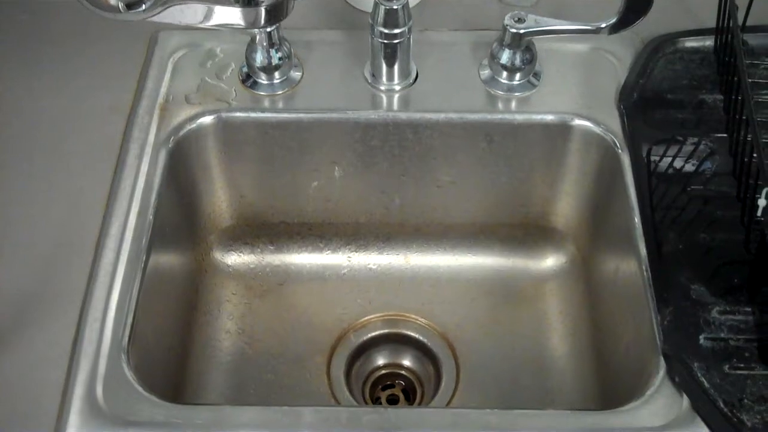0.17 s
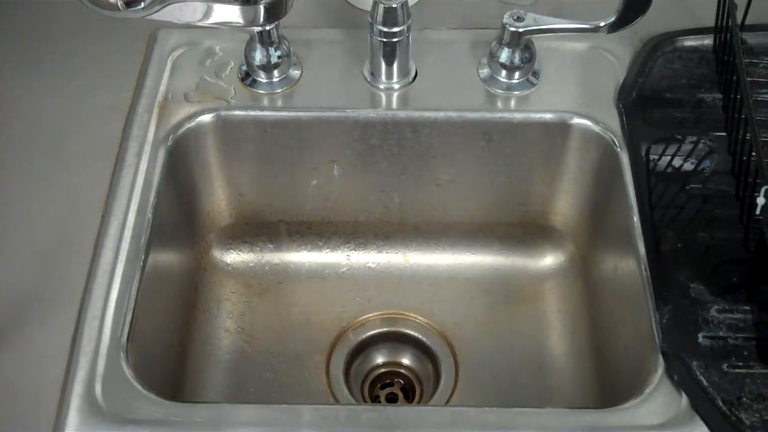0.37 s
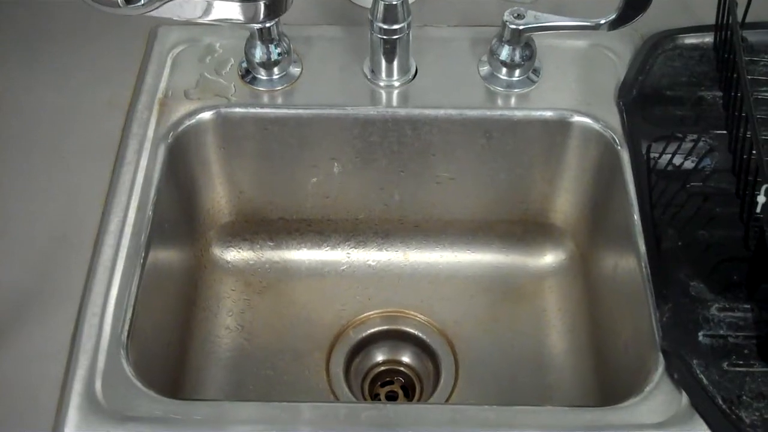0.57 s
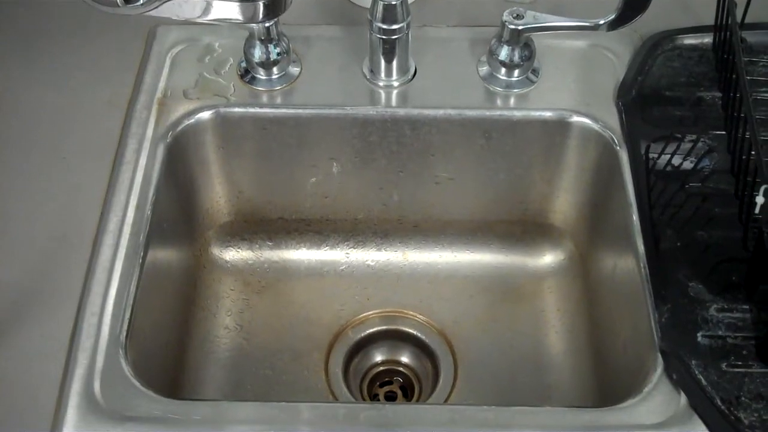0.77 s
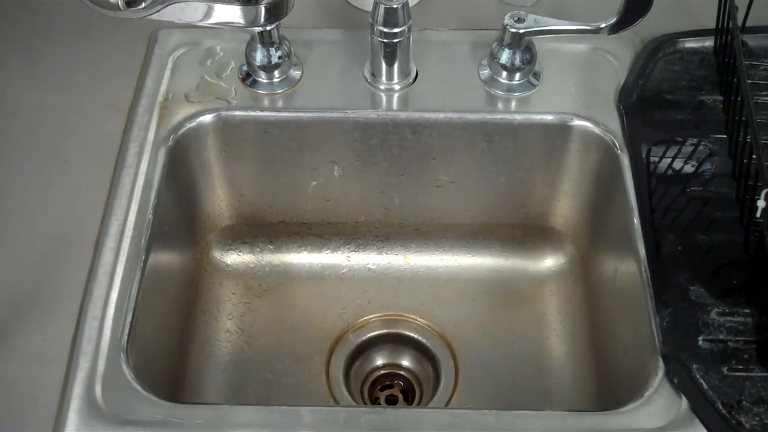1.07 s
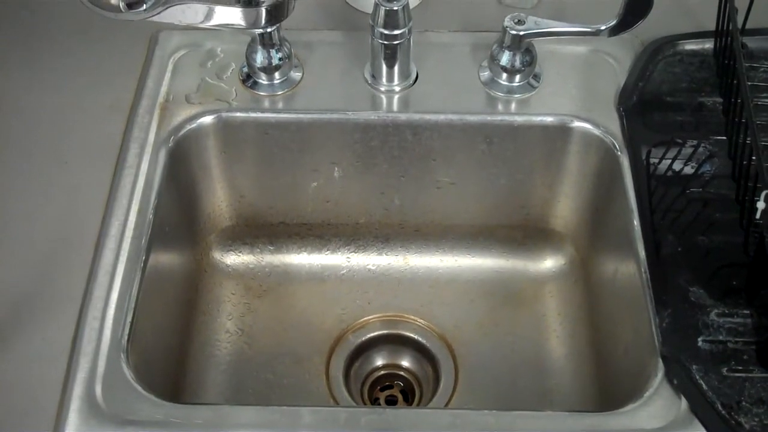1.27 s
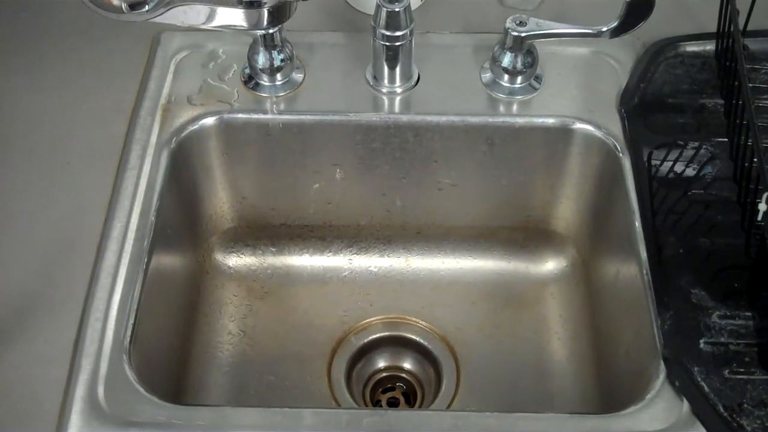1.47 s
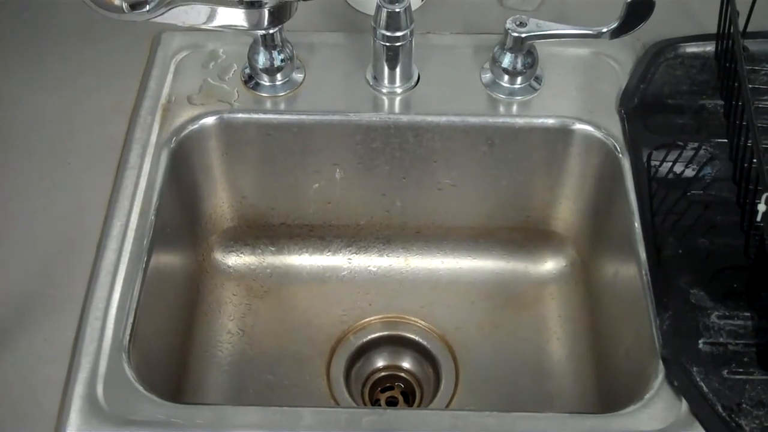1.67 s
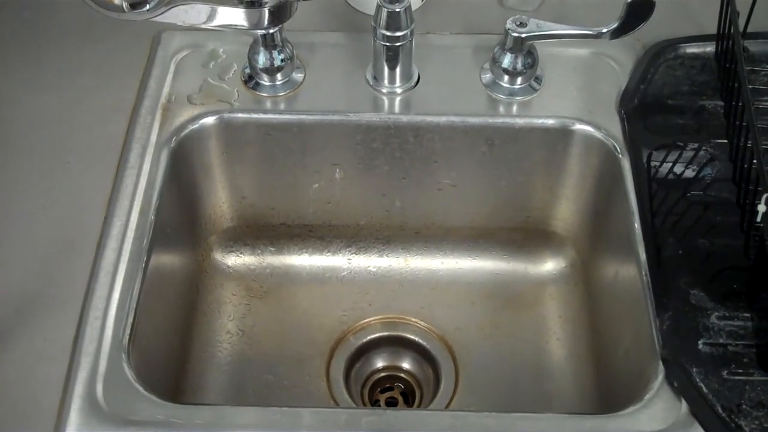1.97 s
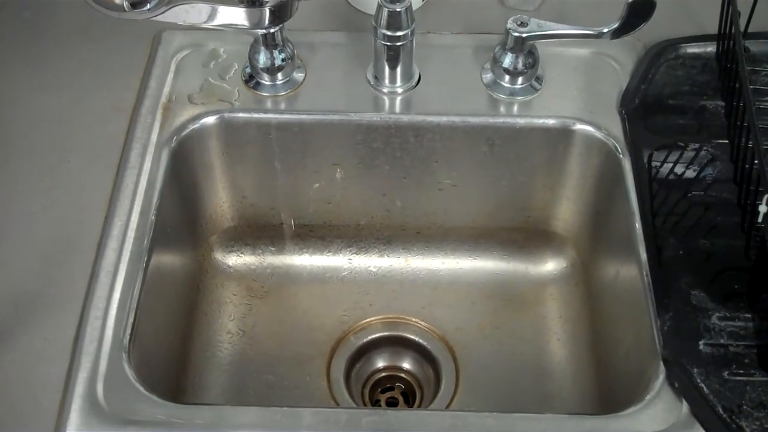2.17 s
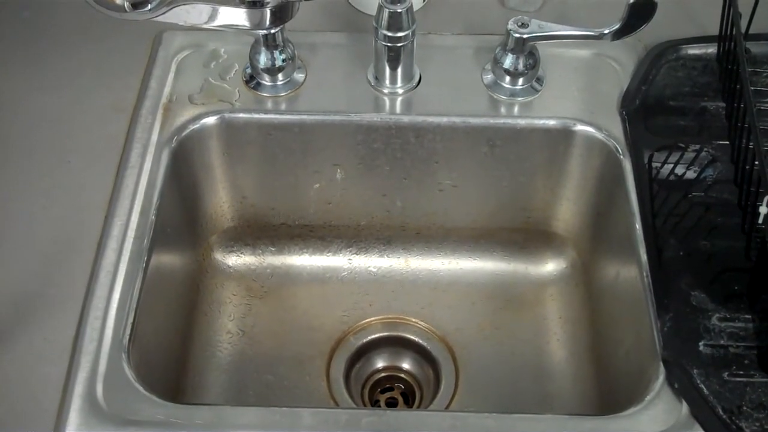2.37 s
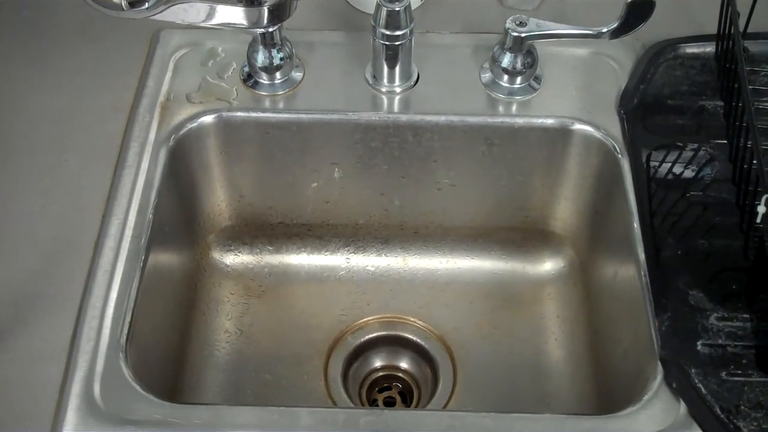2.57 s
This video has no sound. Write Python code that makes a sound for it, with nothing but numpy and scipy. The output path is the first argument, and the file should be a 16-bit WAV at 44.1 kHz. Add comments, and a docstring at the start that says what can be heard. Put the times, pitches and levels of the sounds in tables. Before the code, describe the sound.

Water drops tap a metal sink and plink in the drain while an appliance hums.

```python
"""Dripping faucet in a quiet kitchen

A stereo microphone at a steel sink switches on with a pop just after the start. Each drop taps the basin
and a tiny droplet follows it. At a pace of their own, drips fall down the drain and plink, most trapping
a bubble. Behind them an appliance hums in the small room."""
import sys
import numpy as np
from scipy import signal
from scipy.fft import rfft, irfft
from scipy.io import wavfile
from scipy.ndimage import uniform_filter1d

SR = 44100
rng = np.random.default_rng(int(sys.argv[2]) if len(sys.argv) > 2 else 0)


def persist_wave(psi):
    """Save psi, clipped to +-1, as 16-bit WAV."""
    counts = np.round(np.clip(psi, -1, 1) * 32767).astype(np.int16)
    wavfile.write(sys.argv[1], SR, np.atleast_2d(counts).T)


N = 119952
t = np.arange(N) / SR
LEFT_RIGHT = np.array([[.5], [-.5]])  # splits a lag or level difference between the microphone's ports


def undb(db):
    """Decibels to gain."""
    return 10 ** (np.asarray(db) / 20)


def noise(spectrum):
    """Noise of rms 1, shaped by (Hz, dB) points."""
    hz, db = np.array(spectrum).T
    bins_hz = np.maximum(np.fft.rfftfreq(N, 1 / SR), 1)
    shape = undb(np.interp(np.log(bins_hz), np.log(hz), db))
    shaped = irfft(rfft(rng.standard_normal(N)) * shape, N)
    return shaped / shaped.std()


def wander(rate_hz):
    """A smooth random curve with a spread of 1."""
    jagged = np.interp(t * rate_hz, np.arange(256), rng.standard_normal(256))
    smooth = uniform_filter1d(jagged, int(SR / rate_hz))
    return smooth / smooth.std()


def fade(t60_s):
    """Exponential decay, 60 dB down after t60_s."""
    return np.exp(-np.log(1000) * t / t60_s)


def rise(attack_s):
    """An onset that builds up over the attack time."""
    return 1 - np.exp(-t / attack_s)


def delay(sound, seconds):
    """The same stereo sound, starting later."""
    return np.pad(sound, ((0, 0), (int(seconds * SR), 0)))[:, :N]


def ring(modes, max_lag_s):
    """Decaying modes of alternating sign; each reaches the two ports from its own direction."""
    out = 0
    directions = rng.uniform(-1, 1, len(modes))
    for k, (hz, db, t60_s) in enumerate(modes):
        age = t + directions[k] * max_lag_s * LEFT_RIGHT
        out += (-1) ** k * undb(db) * fade(t60_s) * np.sin(2 * np.pi * hz * age)
    return out


def burst(spectrum, t60_s):
    """Dying noise at both ports, alike in the bass."""
    mid, side = noise(spectrum), noise(spectrum)
    side = signal.sosfilt(signal.butter(1, 1500, "high", fs=SR, output="sos"), side)
    return np.array([mid + side, mid - side]) * fade(t60_s) / np.sqrt(2)


# The appliance's hum, plus the air in the basin ringing faintly at 1599, 1917 and 2079 Hz.
# Each row: frequency in Hz, rms level in dB.
STEADY_TONES = [(59.5, -71), (199, -61.5), (437, -68), (559.5, -62.5), (700, -70), (1087, -81.5),
                (1278, -58.5), (1599, -68), (1917, -72.5), (2079, -79)]
# Fan noise and hiss, shared by the ports (mid) and opposed between them (side).
# Each row: frequency in Hz, relative density in dB.
FAN_MID = [(25, -31), (55, -3.5), (95, -2.5), (150, -9.5), (200, 3.5), (320, 3.5), (500, -2), (780, -2),
           (1300, -7.5), (2000, -13), (2800, -18.5), (5000, -23.5), (6800, -20), (9000, -26), (14000, -32)]
FAN_SIDE = [(25, -26), (90, -4), (150, -7), (210, -1.5), (700, -4), (1400, -1.5), (2000, -6), (2800, -11.5),
            (5000, -12.5), (6800, -10), (9000, -16.5), (14000, -22.5)]


def room_tone(pan_db=-1.74, lag_s=.0001, flutter_db=.84, waver_db=.8, drift_hz=.6):
    """A little to the right, the appliance's hum and faint basin air tones waver over fan noise and hiss."""
    mid = undb(-50 + flutter_db * wander(14)) * noise(FAN_MID)
    side = undb(-58) * noise(FAN_SIDE)
    out = np.array([mid + side, mid - side])
    port_time = np.array([t + lag_s, t])
    for hz, db in STEADY_TONES:
        drift = drift_hz * np.cumsum(wander(5.04)) / SR
        cycles = hz * port_time + drift + rng.random()
        amplitude = np.sqrt(2) * undb(db + waver_db * wander(7.1))
        out += amplitude * np.sin(2 * np.pi * cycles)
    return out * undb(pan_db * LEFT_RIGHT)


def kitchen(direct, reverb_db=-12, top_hz=7200):
    """The small room adds a short, soft reverberation behind the direct sound."""
    tail = rng.standard_normal((2, N)) * fade(t60_s=.2) * rise(attack_s=.016)
    tail /= np.sqrt(np.sum(tail ** 2, axis=1, keepdims=True))
    tail = signal.sosfilt(signal.butter(1, top_hz, fs=SR, output="sos"), tail)
    return direct + undb(reverb_db) * signal.fftconvolve(direct, tail, axes=1)[:, :N]


def switch_on_pop(on_s, open_s, sag_s=.048, coupling_hz=1.15, damping=1.15):
    """A voltage step starts with a crack, sags, ends, and settles through the microphone's coupling."""
    sag = np.exp(-np.maximum(t - on_s, 0) / sag_s)
    step = undb(-3.5) * sag * (t >= on_s) * (t < open_s)
    omega = 2 * np.pi * coupling_hz
    highpass = signal.bilinear([1, 0, 0], [1, damping * omega, omega ** 2], SR)
    pop = signal.lfilter(*highpass, step)
    crack = undb(-17) * rng.standard_normal((2, N)) * fade(t60_s=.0028)
    snap = undb(-9.5) * np.exp(-t / .00004)
    opposed_pop = np.array([pop, -undb(.2) * pop])
    return opposed_pop + delay(crack - snap, on_s)


# Stray spray in the sink. Each row: start in seconds, band centre in Hz, level in dB.
SPECKS = [(0.419, 6450, -58), (.7596, 8460, -52), (1.265, 9350, -53.5)]


def spray(relative_width=.17):
    """Specks of spray land with faint, high ticks."""
    out = 0
    edge = 1 + relative_width / 2
    for start_s, hz, db in SPECKS:
        band = signal.butter(2, [hz / edge, hz * edge], "band", fs=SR, output="sos")
        fizz = signal.sosfilt(band, rng.standard_normal((2, N)))
        tick = fizz / fizz.std() * fade(t60_s=.036) * rise(attack_s=.0007)
        out += delay(undb(db) * tick, start_s)
    return out


def bubble(hz, basin_air, lag_s, glide_per_s=3):
    """A trapped bubble rings briefly, rising in pitch, and sets the air in the basin ringing."""
    age = t + lag_s * LEFT_RIGHT
    cycles = hz * (age + glide_per_s * age ** 2 / 2)
    tone = np.sin(2 * np.pi * cycles) * rise(attack_s=.0004) * fade(t60_s=.024)
    return tone + signal.fftconvolve(tone, basin_air, axes=1)[:, :N]


# Modes of the drain and of the air in the basin.
# Each row: frequency in Hz, gain in dB, time to fall 60 dB in seconds.
DRAIN_MODES = [(4650, -47, .017), (5080, -47, .015), (5630, -51, .022), (6260, -38, .027), (7030, -47, .02),
               (7190, -39.5, .026), (7620, -52, .022), (8750, -51, .02)]
BASIN_AIR_MODES = [(1520, -43, .08), (1610, -50, .06), (1755, -38, .06), (1950, -52, .04),
                   (2090, -50, .045), (2950, -19, .03)]
# The tick of a drip on water. Each row: frequency in Hz, relative density in dB.
TICK_SPECTRUM = [(500, -10), (1800, -27), (3500, -14.5), (5000, 13), (7200, 7.5), (10000, -10),
                 (14000, -11)]
# Drips down the drain. Each row: start in seconds, tick gain in dB, bubble pitch in Hz, its gain in dB.
DRAIN_DRIPS = [(0.3103, -7.5, 1590, -24.5), (0.8204, -5.5, 1920, -27.5), (1.3239, 3, 2060, -23),
               (2.2972, 3, 2000, -70), (2.6725, -15, 2850, -55.5)]


def drain_plinks(pan_db=1.2, bubble_lag_s=.00007):
    """Just left of centre, drips tick on the water in the drain, ring its cavity and trap bubbles."""
    cavity = ring(DRAIN_MODES, max_lag_s=.00004)
    basin_air = ring(BASIN_AIR_MODES, bubble_lag_s)
    out = 0
    for start_s, tick_db, hz, bubble_db in DRAIN_DRIPS:
        impact = undb(-39) * burst(TICK_SPECTRUM, t60_s=.024)
        tick = undb(tick_db) * (cavity + impact) * rise(attack_s=.0003)
        plink = undb(bubble_db) * bubble(hz, basin_air, bubble_lag_s)
        out += delay(tick + plink, start_s)
    return out * undb(pan_db * LEFT_RIGHT)


# Modes of the steel basin. Each row: frequency in Hz, gain in dB, time to fall 60 dB in seconds.
STEEL_MODES = [(700, -45, .1), (795, -41, .11), (890, -45, .1), (1060, -44, .11), (1320, -47, .08),
               (1770, -52, .08), (2265, -46, .06), (3190, -47, .05), (3560, -44, .06), (3890, -46, .05),
               (4050, -45, .06), (6120, -38, .035), (6280, -38, .035), (6600, -43, .035), (7290, -37, .035),
               (7850, -44, .04)]
# The splash and the basin's dense ringing. Each row: frequency in Hz, relative density in dB.
SPLASH_SPECTRUM = [(300, -8), (750, 3.5), (1300, 7), (2700, -3), (3600, -2), (4500, 0.5), (5700, -4.5),
                   (6500, 5.5), (8000, -12.5), (10000, -13), (14000, -24)]
# Drops from the faucet onto the steel. Each row: start in seconds, gain in dB.
FAUCET_DROPS = [(.5714, 1.3), (1.1875, -.4), (1.8041, .2), (2.4167, -1)]


def steel_taps(droplet_after_s=.033, droplet_db=-13):
    """Straight ahead, drops hit one spot and ring the basin alike; each splashes and a droplet follows."""
    steel = ring(STEEL_MODES, max_lag_s=.000044)
    steel += undb(-35) * burst(SPLASH_SPECTRUM, t60_s=.048)  # dense ringing
    out = 0
    for start_s, db in FAUCET_DROPS:
        for hit_s, hit_db in (start_s, db), (start_s + droplet_after_s, db + droplet_db):
            splash = undb(-37) * burst(SPLASH_SPECTRUM, t60_s=.048)
            tap = (steel + splash) * rise(attack_s=.0007)
            out += undb(hit_db) * delay(tap, hit_s)
    return out


def scene():
    """The sink in the foreground with the kitchen around it, over the steady room tone."""
    return kitchen(steel_taps() + drain_plinks() + spray()) + room_tone()


def record(dry):
    """The microphone pops on, then lets the kitchen through; the highest treble is cut."""
    on_s, open_s, top_hz = .08618, .10882, 14400
    live = dry * (t >= open_s) + switch_on_pop(on_s, open_s)
    return signal.sosfilt(signal.ellip(8, .2, 70, top_hz, fs=SR, output="sos"), live)


dry = scene()
out = record(dry)
persist_wave(out)
```